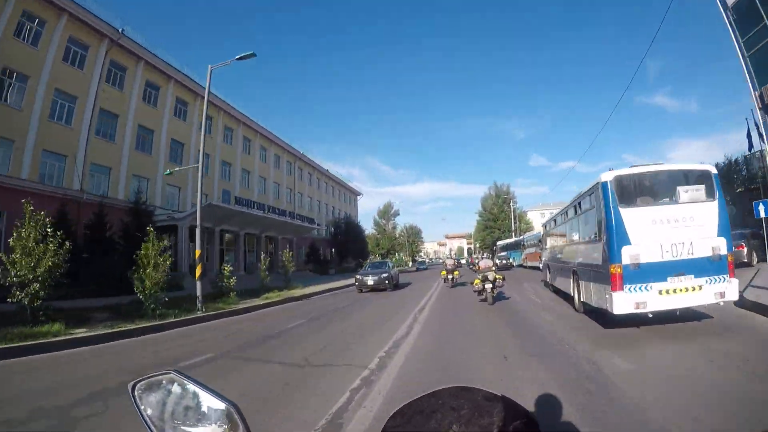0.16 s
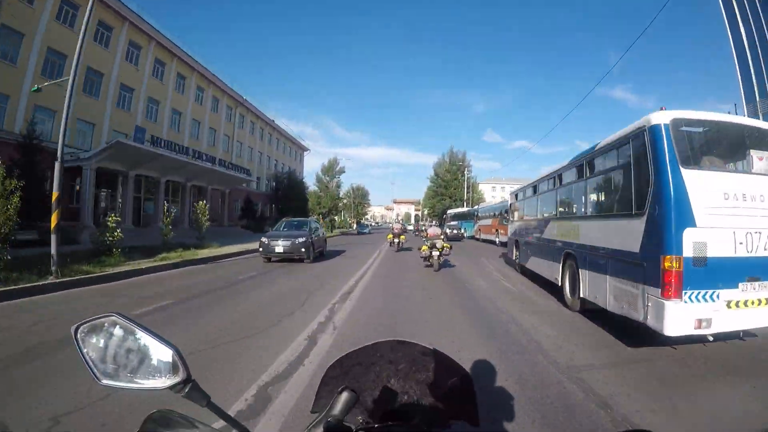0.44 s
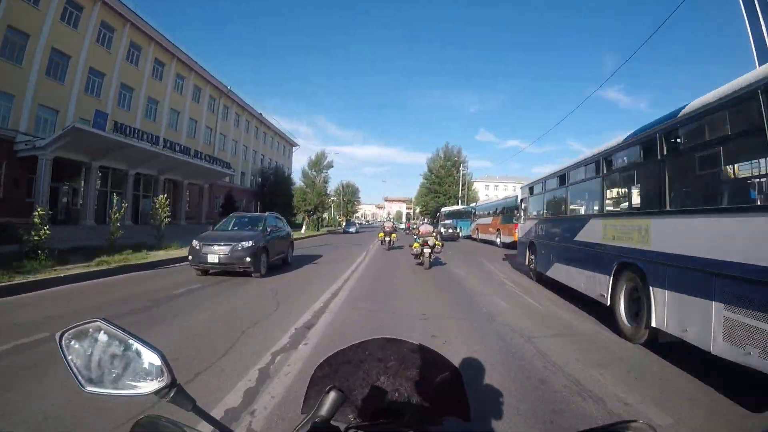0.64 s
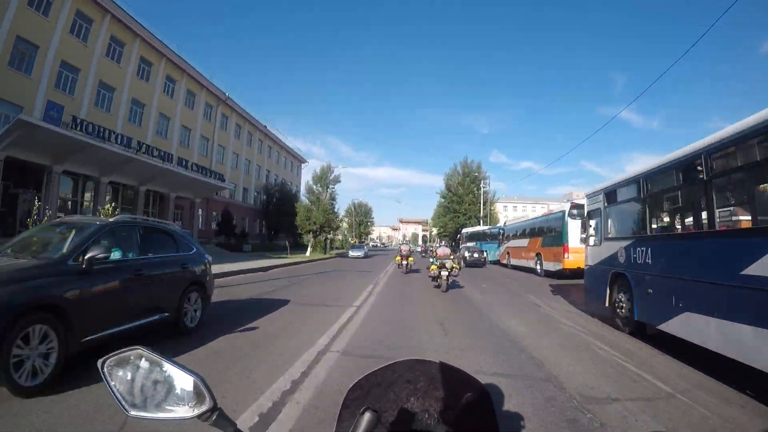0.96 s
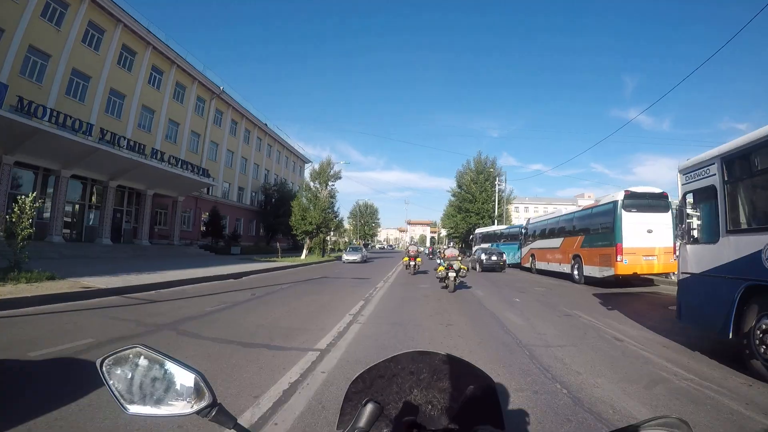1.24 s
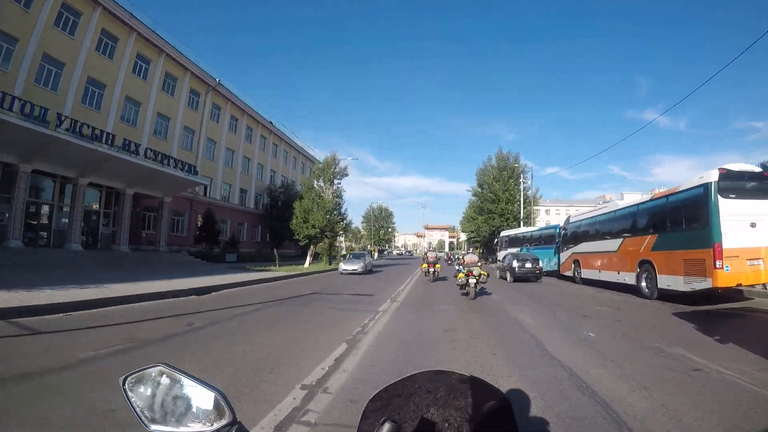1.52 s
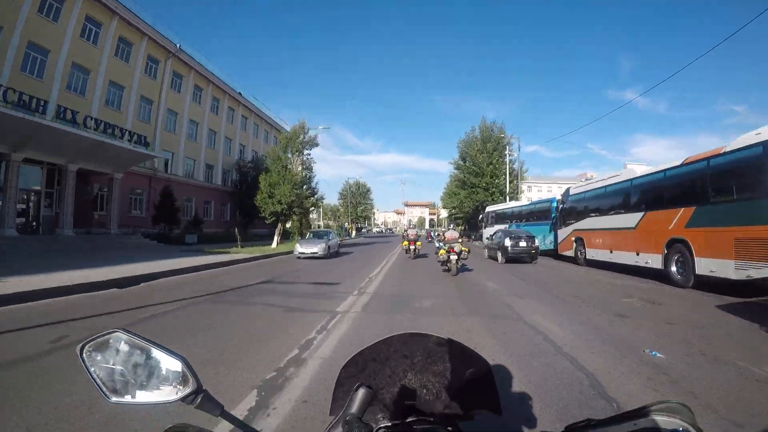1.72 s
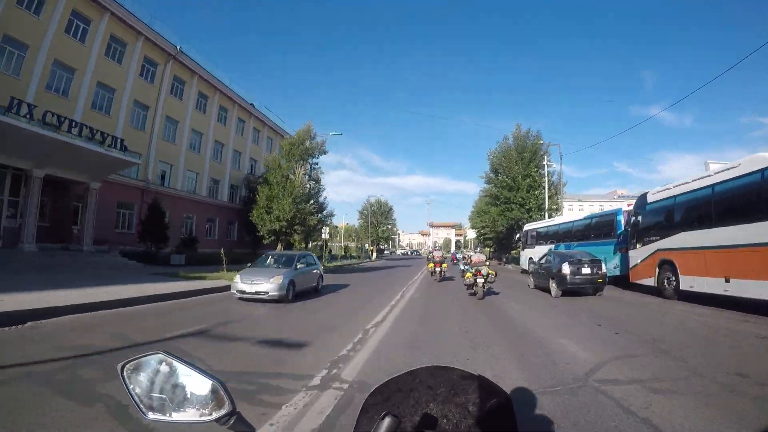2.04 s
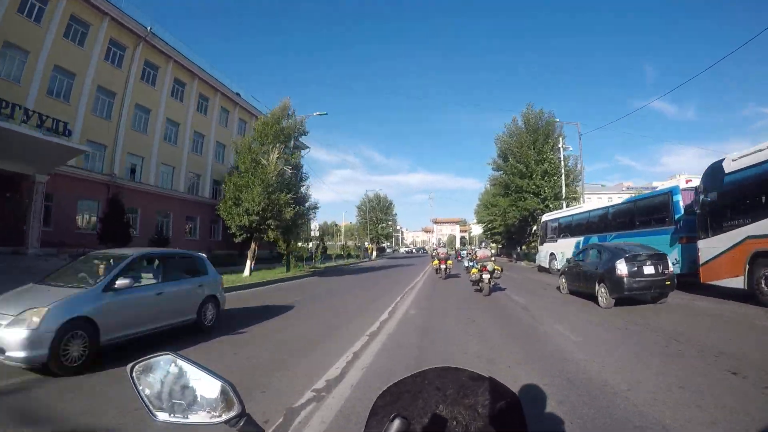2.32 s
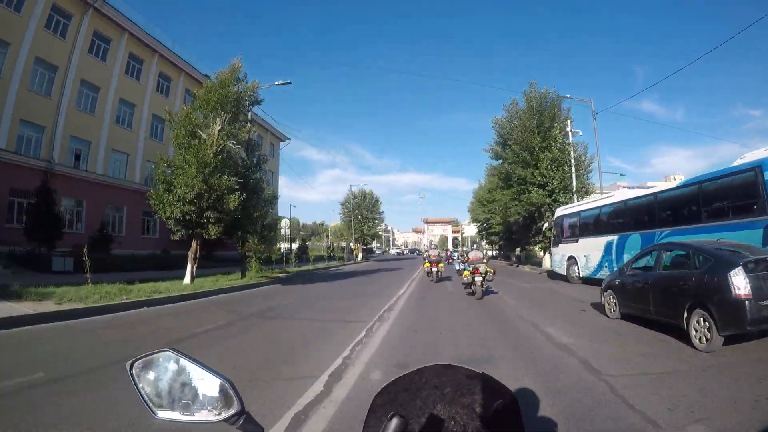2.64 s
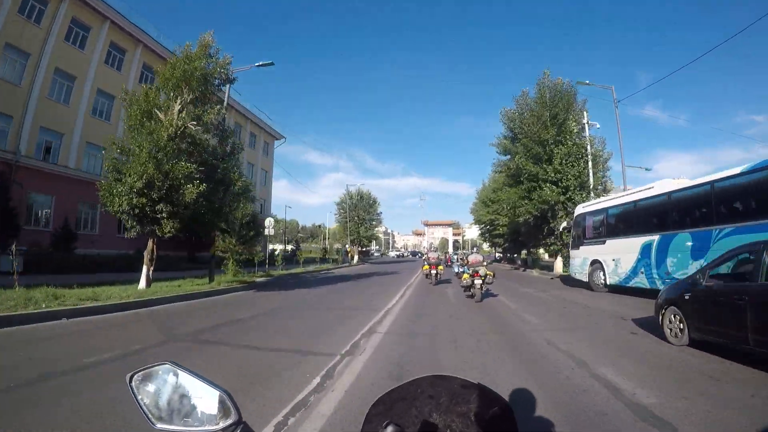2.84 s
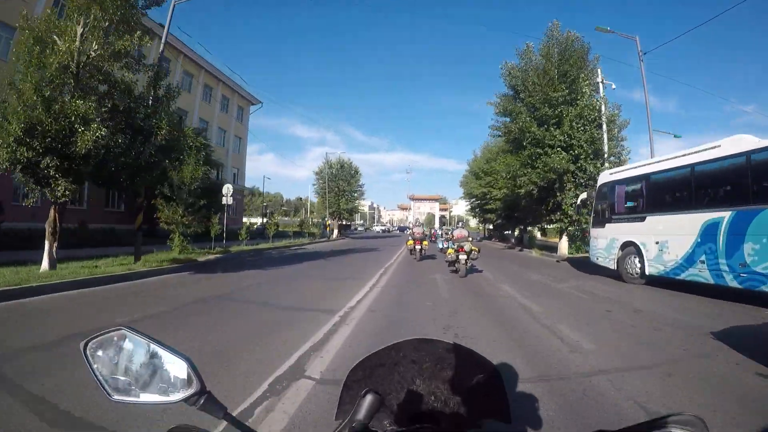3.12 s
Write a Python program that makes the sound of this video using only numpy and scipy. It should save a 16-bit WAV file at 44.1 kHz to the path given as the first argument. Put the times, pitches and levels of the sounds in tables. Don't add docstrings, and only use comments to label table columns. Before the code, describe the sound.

Motorcycle engine throbs low under thumping, snapping head wind, with traffic rush and a brief brake squeal.

```python
import sys
import numpy as np
from scipy import signal
from scipy.fft import rfft, irfft, next_fast_len
from scipy.io import wavfile
from scipy.ndimage import uniform_filter1d, map_coordinates

SR = 44100
rng = np.random.default_rng(int(sys.argv[2]) if len(sys.argv) > 2 else 0)


def store_pcm(level_fs):
    pcm = np.round(np.clip(level_fs, -1, 1) * 32767).astype(np.int16)
    wavfile.write(sys.argv[1], SR, np.atleast_2d(pcm).T)


def magnitude_from_level(level_db):
    exponent = np.asarray(level_db, float) / 20
    return 10 ** exponent


N = 144207

# time in seconds, shaft rate in Hz, level in dB, tilt in dB per order.
ENGINE_S_HZ_DB_TILT = [(0, 37.1, -19.5, 2.5), (.15, 36.56, -15.5, 7.5), (.27, 36.57, -17.5, -4),
                       (.36, 36.37, -13.5, 5), (.5, 36.4, -13, -2), (.62, 36.85, -17, -6),
                       (.72, 36.81, -17, 4), (.9, 36.33, -15, 2), (1.05, 35.53, -21.5, -3),
                       (1.2, 34.74, -17, -10.5), (1.4, 35.53, -10, 2.5), (1.78, 36.11, -16, 4.5),
                       (1.95, 35.67, -14.5, 1.7), (2.17, 34.97, -13, 1), (2.55, 34.6, -13.5, 5),
                       (2.98, 31.97, -10.5, -3.3), (3.11, 31.76, -12, 0.5), (3.27, 31.2, -14, 3)]
# multiple of the shaft rate, level in dB.
EXHAUST_ORDER_DB = [(1, -20.5), (2, -5), (3, -3), (4, -21), (6, -30)]
PIPE_HZ, PIPE_WIDTH_HZ, PIPE_DB = 121.9, 6.8, 18.5
UNSTEADY_DB, UNSTEADY_RAD, BEAT_DB = 2.0, .36, .6

# time in seconds, level in dB, air level in dB.
STREET_S_DB_AIR = [
    (0, -30.5, -71.5),
    (.55, -30.5, -64),
    (.7, -27, -58),
    (1.05, -27, -60.5),
    (1.3, -28, -64.5),
    (1.75, -26, -59.5),
    (2.05, -31, -69),
    (2.55, -32.5, -66.5),
    (2.9, -29, -59.5),
    (3.27, -28.5, -57.5),
]
# frequency in Hz, density in dB per Hz.
ROAD_HZ_DB = [(150, -15.5), (300, -4), (600, -7.5), (1500, -10), (2200, -16), (4000, -22), (9000, -65)]
# frequency in Hz, density in dB per Hz.
HISS_HZ_DB = [(2000, -34.5), (3000, -5), (3900, -0.5), (4800, -9.5), (5900, -9), (6600, -18), (7200, -34.5),
              (9000, -62)]
# frequency in Hz, density in dB per Hz.
AIR_HZ_DB = [(4000, -25), (5500, 0), (7200, -8), (9000, -9), (11000, -21.5), (13000, -33.5), (16000, -54)]
ROAD_DB, HISS_DB, AIR_DB = 1.5, -41.5, 4.5

# time in seconds, strength in dB.
WIND_S_DB = [
    (0, -20.5),
    (.25, -20.5),
    (1, -22.5),
    (1.55, -22),
    (2.6, -27.5),
    (3.27, -27),
]
# frequency in Hz, density in dB per Hz.
BUFFET_HZ_DB = [(8, 4.5), (22, -3.5), (120, -1), (170, -8.5), (400, -18), (800, -35.5), (2500, -63)]
BUFFET_DB, FLUTTER_DB = 7, -10

# start in seconds, end in seconds, pitch in Hz, glide in Hz per s, level in dB.
SQUEALS_S_S_HZ_GLIDE_DB = [(.02, .22, 5810, -100, -56), (.11, .32, 6170, 60, -51),
                           (.17, .54, 9960, -150, -75), (.29, .39, 9220, -50, -71),
                           (.02, .16, 9010, -50, -73), (.51, .66, 6690, -300, -60),
                           (.74, .86, 6600, -500, -58), (.71, .81, 4350, -50, -46),
                           (.85, .9, 4315, -500, -39), (.895, .925, 4285, -500, -31),
                           (.92, .946, 4270, -500, -30), (.948, .972, 4240, -300, -31),
                           (.972, 1.018, 4225, 300, -36), (1.02, 1.063, 4243, -300, -41),
                           (1.07, 1.097, 4225, -50, -40), (.62, .71, 8895, -200, -63),
                           (.73, .82, 9015, -500, -61), (.81, .87, 8790, 300, -58),
                           (.91, .99, 8940, -900, -62), (1.0, 1.09, 9043, -100, -59),
                           (.9, .99, 8520, -100, -60), (1.37, 1.53, 6405, -100, -59),
                           (1.54, 1.72, 9195, -600, -67), (1.63, 1.74, 8475, -100, -64),
                           (1.74, 2.06, 6440, 50, -61), (2.17, 2.72, 8315, -120, -64),
                           (2.7, 2.98, 8300, 50, -63), (3.0, 3.3, 8310, 50, -64),
                           (2.68, 3.03, 5005, -60, -55), (2.7, 3.0, 5070, 100, -57),
                           (2.45, 3.0, 8480, 50, -70), (3.1, 3.3, 8600, 50, -67)]
# time in seconds, length in ms, level in dB, pitch in Hz.
SNAPS_S_MS_DB_HZ = [(0.022, 13, -22.5, 1045), (0.131, 8, -24.5, 915), (0.176, 9.1, -25, 1360),
                    (0.201, 12, -16.5, 1143), (0.22, 6.7, -19, 860), (0.23, 13, -20, 917),
                    (0.456, 5, -15, 846), (0.472, 7.6, -16.5, 700), (0.587, 6, -26, 1890),
                    (0.597, 6, -11, 1630), (0.605, 6.5, -22, 1130), (0.483, 7, -20.5, 800),
                    (0.41, 12, -22, 1103), (0.787, 9, -17, 892), (0.802, 10, -13, 1006),
                    (0.83, 6, -23, 955), (0.841, 6.7, -21, 880), (0.923, 12, -24.5, 1030),
                    (1.029, 8, -16, 1206), (1.038, 7, -16, 685), (1.121, 9.4, -17.5, 1016),
                    (1.159, 5.5, -17, 900), (1.3125, 4.5, -18.5, 853), (1.35, 8.2, -17.5, 868),
                    (1.369, 3.7, -18.5, 1790), (1.3745, 4.3, -18.5, 1500), (1.402, 2.5, -14.5, 1500),
                    (1.443, 5.6, -19.5, 877), (1.529, 2.7, -22, 1150), (1.573, 4.4, -19.5, 1287),
                    (1.694, 6.3, -10.5, 1474), (1.661, 8, -23, 800), (1.678, 12, -14, 1310),
                    (1.702, 6.6, -18, 1620), (1.813, 7, -15.5, 1870), (1.819, 6, -21, 1212),
                    (1.988, 7.8, -32.5, 920), (2.198, 8, -26, 1120), (2.272, 4, -18, 1600),
                    (2.265, 6.79, -25, 1820), (2.306, 4.5, -19.5, 1365), (3.241, 13, -21.5, 1074)]
# frequency in Hz, gain in dB.
CAVITY_HZ_DB = [(20, 0), (2600, 0), (3100, -12), (6000, -22), (12000, -50)]
# time in seconds, depth in dB, pitch in Hz.
SUCKS_S_DB_HZ = [
    (.176, -9, 300),
    (.403, -7, 300),
    (.4585, -6, 260),
    (1.037, -4, 290),
    (1.364, -4, 150),
    (1.373, -1, 160),
    (1.692, -7, 260),
    (1.817, -1, 170),
    (2.2752, -1, 160),
]
# time in seconds, level in dB, pitch in Hz.
THUMPS_S_DB_HZ = [
    (.236, -16.5, 247),
    (.406, -17.5, 313),
    (.477, -14.5, 269),
    (0.795, -12, 241.4),
    (1.039, -13.5, 340),
    (1.115, -18, 334),
    (1.32, -19, 330.3),
    (1.366, -12, 304),
    (1.668, -15.5, 347.1),
    (1.822, -14, 240),
]
# start in seconds, end in seconds, pitch in Hz, level in dB.
WHISTLES_S_S_HZ_DB = [(.3, .58, 822, -34.5), (.6, .71, 820, -35), (1.44, 1.64, 825, -34),
                      (1.6, 2.12, 821, -35), (2.25, 2.42, 820, -36), (2.55, 3.18, 820, -34.5),
                      (.7, .8, 1350, -33), (1.48, 1.76, 965, -39), (2.0, 2.22, 960, -42),
                      (2.35, 3.05, 188, -33), (2.6, 3.1, 222, -34), (2.74, 2.9, 1118, -39),
                      (2.93, 3.1, 1116, -36), (3.12, 3.33, 1117, -33), (3.1, 3.35, 967, -39),
                      (1.79, 1.92, 1430, -34), (1.71, 1.8, 1500, -35), (1.84, 1.93, 1590, -36),
                      (1.95, 2.14, 1400, -42), (2.17, 2.24, 1370, -36)]
# time in seconds, level in dB.
RINGS_S_DB = [
    (0.463, -21.5),
    (0.472, -26),
    (1.3684, -20),
    (1.401, -31),
    (1.812, -29.5),
    (2.272, -26),
    (2.305, -25.5),
]
# time in seconds, level in dB.
CRACKS_S_DB = [
    (.598, -28),
    (0.6042, -17.5),
    (1.37, -21.5),
    (1.402, -38.5),
    (1.696, -26.5),
    (1.813, -25),
    (2.272, -29),
    (2.306, -41),
]
# frequency in Hz, gain in dB.
PORT_HZ_DB = [(3000, 0), (6400, -5.5), (7200, -15.5), (10000, -19.5), (14000, -55)]
THUMP_MS, RING_MS, RING_HZ, CRACK_MS, CRACK_HZ = 13.65, 3, 2500, 2.5, 5040

LIMIT_DB, RELEASE_S, RATIO = -9, 0.062, 0.32


def unit(x):
    return x / np.sqrt(np.mean(x ** 2) + 1e-20)


def curves(rows):
    s, *cols = np.transpose(rows)
    return [np.interp(np.arange(N) / SR, s, c) for c in cols]


def wobble(rate_hz):
    return map_coordinates(rng.standard_normal(400), [np.arange(N) * rate_hz / SR])


def coloured(x, points):
    size = next_fast_len(N + 8192)
    hz, db = np.transpose(points)
    log_hz = np.log(np.fft.rfftfreq(size, 1 / SR) + 1)
    gain = magnitude_from_level(np.interp(log_hz, np.log(hz + 1), db, left=-140, right=-140))
    return irfft(rfft(x, size) * gain, size)[:N]


def rush(points, patchy_db):
    z = signal.stft(rng.standard_normal(N), nperseg=512)[2]
    field = uniform_filter1d(rng.standard_normal(z.shape), size=5, axis=0)
    field = uniform_filter1d(field, size=8, axis=1)
    noise = signal.istft(z * magnitude_from_level(patchy_db * unit(field)), nperseg=512)[1][:N]
    return unit(coloured(noise, points))


def grains(s, hz, gain, turns, phase=None):
    t = np.arange(-400, 400) / SR
    if phase is None:
        phase = rng.random((len(s), 1))
    bell = np.hanning(len(t)) * np.exp(-(t * hz[:, None] / turns) ** 2)
    wave = gain[:, None] * bell * np.cos(2 * np.pi * (t * hz[:, None] + phase))
    at = np.clip(np.round((s[:, None] + t) * SR).astype(int), 0, N)
    return np.bincount(at.ravel(), wave.ravel(), N + 1)[:N]


def eddies(rows, spread, turns, lift_db, count):
    s, ms, db, hz = (c[:, None] for c in np.transpose(rows))
    place = np.linspace(-.55, .55, count) + .1 * rng.standard_normal((len(s), count))
    when = s + np.abs(ms) / 1000 * place
    pitch = hz * np.exp(spread * rng.standard_normal(when.shape))
    build_db = -2.25 * np.linspace(1, 0, count)
    gain = magnitude_from_level(db + lift_db + build_db + 2 * rng.standard_normal(when.shape)) * np.sqrt(hz / pitch)
    return grains(when.ravel(), pitch.ravel(), gain.ravel(), turns)


def tones(rows, flicker_db, flicker_rate_hz, waver_hz):
    out, flicker, waver = np.zeros(N), wobble(flicker_rate_hz), wobble(90)
    for start, end, hz, glide, db in rows:
        at = np.arange(int(start * SR), min(int(end * SR), N))
        pick = np.abs(at - rng.integers(N))
        u = (at / SR - start) / (end - start)
        pitch = hz + glide * (u - .5) * (end - start) + waver_hz * waver[pick]
        swell = np.abs(np.sin(np.pi * u)) ** .5
        level = magnitude_from_level(db + 4.0 + flicker_db * flicker[pick])
        out[at] += level * swell * np.sin(2 * np.pi * np.cumsum(pitch) / SR)
    return out


def engine():
    shaft_hz, db, tilt_db = curves(ENGINE_S_HZ_DB_TILT)
    turn = 2 * np.pi * np.cumsum(shaft_hz) / SR
    beat_db = BEAT_DB * np.cos(turn / 2)
    out = np.zeros(N)
    for k, order_db in EXHAUST_ORDER_DB:
        load_db = tilt_db * (min(k, 4) - 2.5)
        pipe_db = PIPE_DB * np.exp(-((k * shaft_hz - PIPE_HZ) / PIPE_WIDTH_HZ) ** 2)
        level_db = db + order_db + load_db + beat_db + pipe_db + UNSTEADY_DB * wobble(9.02)
        out += magnitude_from_level(level_db) * np.sin(k * turn + UNSTEADY_RAD * wobble(12))
    return out * np.sqrt(2)


def street():
    db, air_db = curves(STREET_S_DB_AIR)
    body = magnitude_from_level(db + ROAD_DB) * rush(ROAD_HZ_DB, patchy_db=2.0)
    hiss = magnitude_from_level(HISS_DB + 0.36 * (db - db.mean())) * rush(HISS_HZ_DB, patchy_db=1.1)
    air = magnitude_from_level(air_db + AIR_DB) * rush(AIR_HZ_DB, patchy_db=1.5)
    return magnitude_from_level(.7 * wobble(7)) * (body + hiss + air)


def buffeting():
    db, = curves(WIND_S_DB)
    gusts = magnitude_from_level(1.8 * wobble(14)) * rush(BUFFET_HZ_DB, patchy_db=1.0)
    return magnitude_from_level(db + BUFFET_DB) * unit(gusts)


def flutter():
    db, = curves(WIND_S_DB)
    s = rng.random(400) * N / SR
    hz = 650 * magnitude_from_level(4.65 * rng.standard_normal(400))
    gain = np.minimum(magnitude_from_level(-3 * np.log(rng.random(400))), 3.5)
    return magnitude_from_level(db + FLUTTER_DB) * unit(grains(s, hz, gain, turns=0.87))


def brake_squeals():
    return tones(SQUEALS_S_S_HZ_GLIDE_DB, flicker_db=4.5, flicker_rate_hz=80, waver_hz=26)


def snaps():
    return coloured(eddies(SNAPS_S_MS_DB_HZ, spread=0.4, turns=0.56, lift_db=1.5, count=16), CAVITY_HZ_DB)


def sucks():
    s, depth_db, hz = np.transpose(SUCKS_S_DB_HZ)
    return grains(s, hz, magnitude_from_level(depth_db), turns=.6, phase=.5)


def thumps():
    rows = [(s, THUMP_MS, db, hz) for s, db, hz in THUMPS_S_DB_HZ]
    return eddies(rows, spread=0.26, turns=0.73, lift_db=3, count=4)


def mount_whistles():
    rows = [(start, end, hz, 0, db) for start, end, hz, db in WHISTLES_S_S_HZ_DB]
    return tones(rows, flicker_db=2.8, flicker_rate_hz=40, waver_hz=8)


def port_rings():
    rows = [(s, RING_MS, db, RING_HZ) for s, db in RINGS_S_DB]
    return eddies(rows, spread=.06, turns=4, lift_db=2.5, count=3)


def cracks():
    rows = [(s, CRACK_MS, db, CRACK_HZ) for s, db in CRACKS_S_DB]
    return coloured(eddies(rows, spread=0.38, turns=0.62, lift_db=7.5, count=5), PORT_HZ_DB)


def scene():
    wind = buffeting() + flutter() + snaps() + sucks() + thumps() + port_rings() + cracks()
    return (engine() + street() + wind + brake_squeals() + mount_whistles())[None]


def band_limit(x):
    return signal.sosfilt(signal.butter(12, 15650, fs=SR, output="sos"), x)


def record(dry):
    rms = np.abs(uniform_filter1d(dry ** 2, size=220, axis=1)) ** .5
    over_db = np.maximum(20 * np.log10(rms + 1e-9) - LIMIT_DB, 0)
    keep = np.exp(-1 / (RELEASE_S * SR))
    duck_db = RATIO * 10 * signal.lfilter([1 - keep], [1, -keep], over_db, axis=1)
    x = dry * magnitude_from_level(-duck_db)
    x = x / (1 + np.abs(x / 1.05) ** 6) ** (1 / 6)
    fade_in = np.minimum(np.arange(N) / SR / .012 + .4, 1)
    return band_limit(x * fade_in)


dry = scene()
out = record(dry)
store_pcm(out)
```